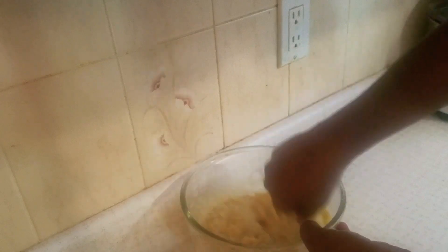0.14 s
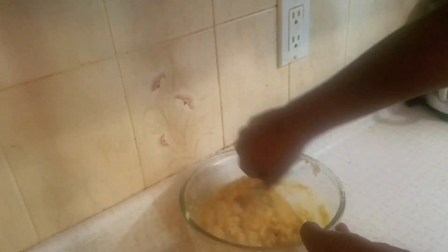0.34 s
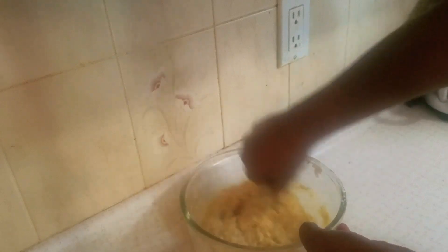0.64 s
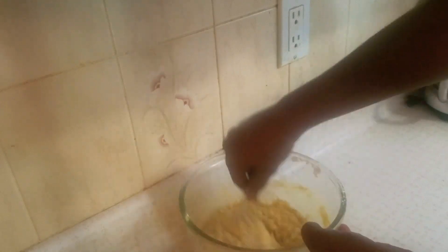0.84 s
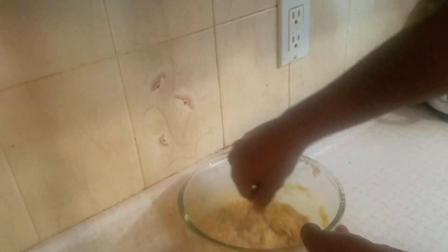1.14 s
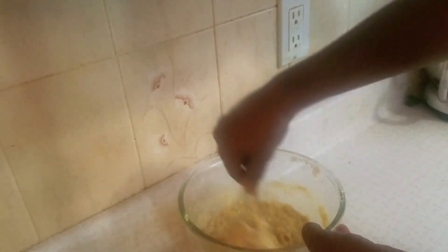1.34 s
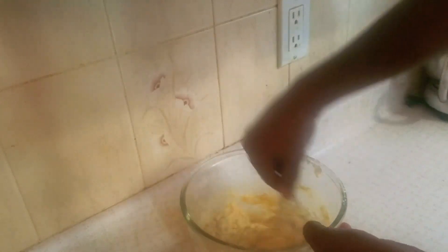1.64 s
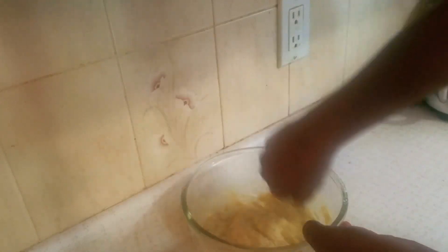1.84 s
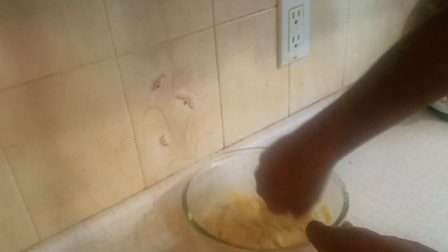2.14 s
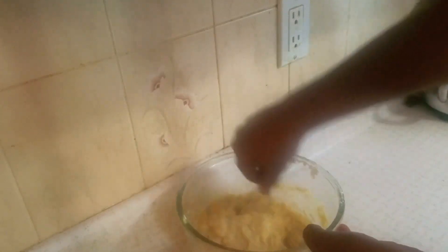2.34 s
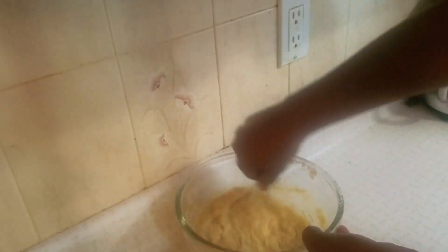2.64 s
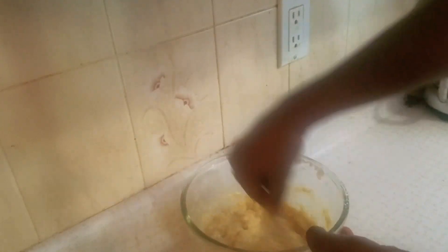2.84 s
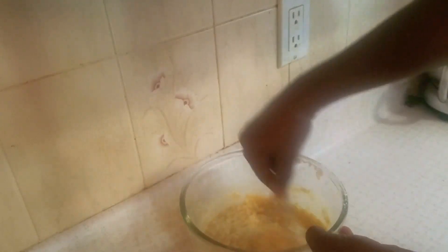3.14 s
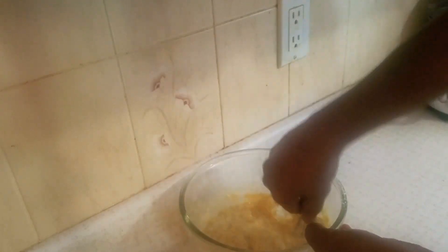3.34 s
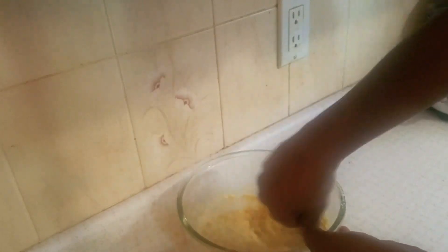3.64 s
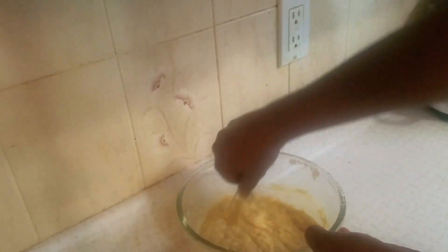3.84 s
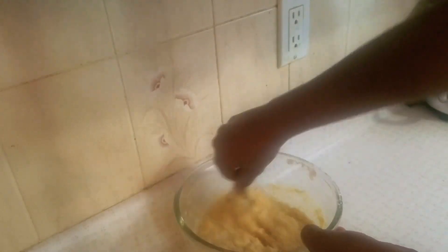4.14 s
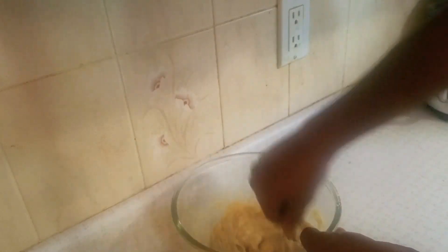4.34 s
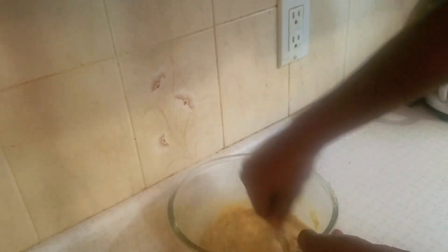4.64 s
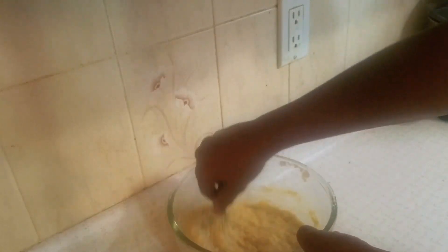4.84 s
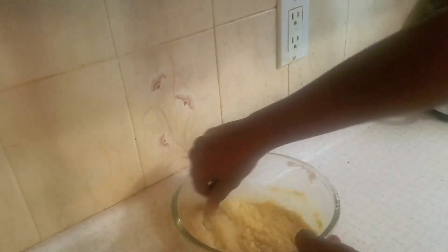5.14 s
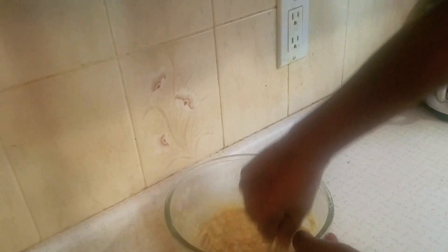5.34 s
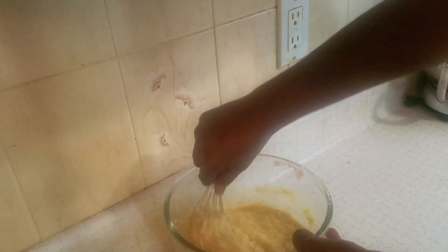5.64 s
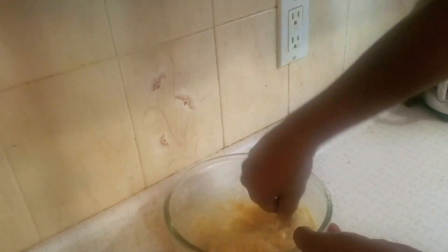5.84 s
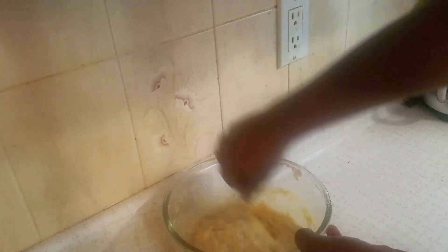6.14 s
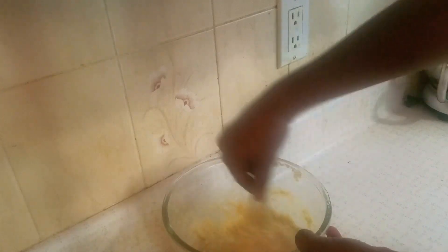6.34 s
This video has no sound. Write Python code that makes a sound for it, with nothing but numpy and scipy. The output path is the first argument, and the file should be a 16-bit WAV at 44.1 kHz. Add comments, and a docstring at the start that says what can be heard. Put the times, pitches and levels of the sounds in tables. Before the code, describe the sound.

Close up and slightly to the right, thick batter churns and crackles wetly under quick whisk strokes. Much louder than the stirring, the glass bowl tips and drops back on the counter with hollow, clattering knocks, first near the beginning and again in a cluster in the second half. In between, the wires give a few short clicks on the glass. The tiled kitchen adds a brief echo, and an appliance hums faintly behind.

```python
"""Whisking batter in a glass bowl

A wire whisk stirs thick batter in a tiled kitchen: the mass churns, its surface squelches and
crackles, air pockets pop. Hard strokes tip the bowl so that it knocks on the hollow counter;
now and then a wire clicks against the glass. An appliance hums behind."""
import sys
import numpy as np
from scipy import signal
from scipy.fft import rfft, irfft
from scipy.io import wavfile
from scipy.ndimage import map_coordinates

SR = 44100
rng = np.random.default_rng(int(sys.argv[2]) if len(sys.argv) > 2 else 0)


def generate_wav(signal):
    """Clip the signal to [-1, 1] and save it as 16-bit WAV at the path in sys.argv[1]."""
    frames = np.transpose(np.atleast_2d(signal))
    scaled = np.clip(frames, -1, 1) * 32767
    pcm = np.round(scaled).astype(np.int16)
    wavfile.write(sys.argv[1], SR, pcm)


N = 286650

# drag of the wires between strokes, easing as the batter smooths: t/s, level/dB
DRAG_EFFORT = [(0, -4), (1.0, -2.5), (1.25, -7.5), (2.4, -5), (3.4, -5), (4.3, -4.5), (4.8, -11.5),
               (5.3, -7), (5.6, -17.5), (5.9, -14), (6.5, -8.5)]


def from_db(db):
    return 10 ** (np.asarray(db) / 20)


def unit_rms(x):
    return x / np.sqrt(np.mean(x ** 2) + 1e-20)


def at_hz(points, hz):
    """Table lookup on a log-frequency axis."""
    freq, value = np.transpose(points)
    return np.interp(np.log(np.maximum(hz, 1)), np.log(freq), value)


def drift(rate_hz):
    """Slow random wander, rms 1."""
    r = np.exp(-80 * np.pi * rate_hz / SR)
    slow = signal.lfilter([1], [1, -2 * r, r * r], rng.standard_normal(N // 40 + 2002))[2000:]
    return np.interp(np.arange(N) / 40, np.arange(len(slow)), unit_rms(slow))


def cut(x, hz, kind, order=2):
    """Butterworth low- or high-pass."""
    return signal.sosfilt(signal.butter(order, min(hz, .45 * SR), kind, fs=SR, output="sos"), x + 1e-18)


def ring(force, hz, t60_s):
    """One mode: a unit click starts a decaying sine of height 1."""
    r, w = from_db(-60 / (t60_s * SR)), 2 * np.pi * hz / SR
    return signal.lfilter([0, np.sin(w)], [1, -2 * r * np.cos(w), r * r], force + 1e-18)


def modes(force, table):
    """A body's modes driven by a force."""
    return sum(from_db(db) * ring(force, hz, t60_s) for hz, db, t60_s in table)


def crack(spectrum, size=1024):
    """Crowded modes answer a blow with one minimum-phase snap; energy 1."""
    hz = np.arange(size // 2 + 1) * SR / size
    cepstrum = irfft(np.log(from_db(at_hz(spectrum, hz))))
    snap = irfft(np.exp(rfft(2 * cepstrum[:size // 2], size)))
    return snap / np.linalg.norm(snap)


def add(track, start_s, sound):
    i = max(round(start_s * SR), 0)
    track[..., i:i + sound.shape[-1]] += sound[..., :max(N - i, 0)]


def pan(x, left_db, right_lag_s=0):
    """Level of left against right, with an optional lag on the right."""
    right = map_coordinates(x[1], [np.arange(N) - right_lag_s * SR], order=3) if right_lag_s else x[1]
    return np.array([x[0], right]) * from_db([[left_db / 2], [-left_db / 2]])


def diffuse(size):
    """Frequencies and spectrum of stereo white noise, alike in the bass, unrelated in the treble."""
    # room field: f/Hz, left-right correlation
    correlation = [(130, 0.95), (300, 0.98), (640, 0.44), (1400, 0), (3000, 0), (7000, 0), (15000, 0)]
    hz = np.arange(size // 2 + 1) * SR / size
    mid, side = rfft(rng.standard_normal((2, size)))
    alike = np.clip(at_hz(correlation, hz), -1, 1)
    return hz, np.sqrt((1 + alike) / 2) * mid + np.sqrt((1 - alike) / 2) * side * [[1], [-1]]


def noise(spectrum):
    """Coloured diffuse noise, rms 1."""
    hz, white = diffuse(N)
    return unit_rms(irfft(white * from_db(at_hz(spectrum, hz)), N))


def kitchen(x, wet_db, early_db, early_s=0.0065, low_hz=220, size=24000):
    """Direct sound, early echoes off bowl and tiles, and a room tail dying band by band."""
    # room decay: f/Hz, t60/s
    room_t60 = [(150, 0.23), (500, 0.39), (1500, 0.41), (4000, 0.36), (8000, 0.22), (15000, 0.15)]
    t = np.arange(size) / SR
    hz, white = diffuse(size)
    edges_hz = np.geomspace(100, SR / 2, num=9)
    arrived, early = t > .0008, np.exp(-t / early_s)
    early = from_db(early_db) * early / np.linalg.norm(early)
    response = 0
    for low, high in zip(edges_hz, edges_hz[1:]):
        tail = from_db(-60 * t / at_hz(room_t60, np.sqrt(low * high)))
        envelope = np.hypot(from_db(wet_db) * tail / np.linalg.norm(tail), early)
        band = irfft(white * (hz >= low) * (hz < high), size)
        response = response + band * envelope * arrived
    out = signal.fftconvolve(x[None], cut(response, low_hz, "high"), axes=1)
    out[:, :len(x)] += x
    return out[:, :N]


def background(air_db=-49):
    """An appliance's mains hum and the still air of the room."""
    # hum partials: f/Hz, level/dB
    partials = [(59.2, -50), (118.4, -50), (174, -56)]
    # room noise density: f/Hz, level/dB
    air_spectrum = [(20, -15.5), (50, 0), (80, -5.5), (125, -1), (200, -13.5), (350, -13), (700, -17.5),
                    (1500, -29.5), (4000, -41), (8500, -65), (15000, -38)]
    t = np.arange(N) / SR
    hum = 0
    for hz, db in partials:
        amplitude = np.sqrt(2) * from_db(db + drift(3.9))
        hum = hum + amplitude * np.sin(2 * np.pi * hz * t + 0.51 * drift(1.8))
    return pan(hum + from_db(air_db) * noise(air_spectrum), -1.5)


def stirring(attack_s=0.029, release_s=0.038, drag_depth_db=2):
    """Strokes over steady drag; envelopes of push on the mass, pull on the surface, tearing of films."""
    # whisk sweeps: t/s, length/s, effort/dB, depth in the mass/dB, stickiness/dB
    strokes = [(0.0, .07, -0.5, -14, 3), (0.146, .06, 2, 2, 5.5), (0.412, 0.063, 5.5, 3.5, 0.5),
               (0.667, .12, 5, -2.5, 0), (1.005, 0.053, 2.5, 0.5, -4.5), (1.129, 0.019, -6.5, 9.5, -3),
               (1.565, .12, 1, -6, -3.5), (1.891, 0.086, 5.5, -3.5, 4), (2.126, 0.23, 0, -2.5, -1.5),
               (2.466, 0.073, -2, 8, 3), (2.72, 0.1, 5.5, -1.5, -6), (2.976, 0.33, -4, -0.5, 1),
               (3.377, 0.048, 4, -5, -2), (3.651, 0.045, 0, 5, -2.5), (3.924, .11, -3.5, 8, 1),
               (4.237, .12, 0.5, 6.5, -3), (4.592, 0.13, -5.5, 12.5, 0), (4.899, 0.16, -4, 5, -13),
               (5.705, .02, -3.5, -3, 0), (5.833, 0.085, -7.5, 8.5, -2), (6.086, 0.17, -6, 2, -1.5)]
    t = np.arange(N) / SR
    drag = from_db(np.interp(t, *np.transpose(DRAG_EFFORT)))
    power = (drag * from_db([[drag_depth_db], [0], [0]])) ** 2
    for start_s, length_s, effort_db, depth_db, sticky_db in strokes:
        swell = np.clip((t - start_s) / attack_s, 0, 1)
        release = np.exp(-np.clip((t - start_s - length_s) / release_s, 0, 20))
        power += (swell * release * from_db(effort_db) * from_db([[depth_db], [0], [sticky_db]])) ** 2
    return np.sqrt(power)


def film_snaps(spectrum, per_s, spread_db, clump_db, cycles, pitches=36):
    """Tiny batter films snap in clumps, each ringing a few cycles; rms 1."""
    born = rng.random(N) < per_s * from_db(clump_db * drift(25)) / SR
    clicks = born * from_db(spread_db * np.minimum(rng.exponential(1, N), 4)) * rng.choice([-1, 1], N)
    pitch_index = rng.integers(0, pitches, N)
    out = 0
    for k, hz in enumerate(np.geomspace(spectrum[0][0], min(spectrum[-1][0], .45 * SR), pitches)):
        snaps = np.diff(ring(clicks * (pitch_index == k), hz, cycles / hz), prepend=0)
        out = out + unit_rms(snaps) * np.sqrt(hz) * from_db(at_hz(spectrum, hz))
    return unit_rms(out)


def circling(x, wet_db, early_db, early_s, turns_per_s=2.9, spots=5):
    """The whisk circles the bowl from spot to spot, each with its own echoes."""
    turns = turns_per_s * np.arange(N) / SR
    distances = [np.abs((turns + k / spots) % 1 - .5) for k in range(spots)]
    return sum(kitchen(x * np.clip(1.5 - 2 * spots * d, 0, 1), wet_db, early_db, early_s) for d in distances)


def batter(churn_db=-47.5, squelch_db=-60, crackle_db=-66, crackle_exponent=0.86):
    """The wires churn the mass dully; its surface squelches and crackles as it parts."""
    # spectral densities of mass, surface and tearing films: f/Hz, level/dB
    churn_spectrum = [(30, -30), (80, -8), (165, 1.5), (250, -4.5), (370, -0.5), (600, -15.5), (900, -14.5),
                      (1500, -31.5), (3000, -47.5)]
    squelch_spectrum = [(600, 2), (1200, 7.5), (2100, 1), (3500, -5), (6000, -16.5), (9000, -110)]
    crackle_spectrum = [(4000, -5.5), (6500, 0), (8300, -51), (11500, 13), (15500, 3.5)]
    push, pull, tearing = stirring()
    churn = push * from_db(churn_db + 1.66 * drift(19)) * noise(churn_spectrum)
    squelch = film_snaps(squelch_spectrum, per_s=2000, spread_db=3.0, clump_db=3.5, cycles=5.7)
    squelch *= pull * from_db(squelch_db)
    crackle = film_snaps(crackle_spectrum, per_s=1000, spread_db=4.0, clump_db=4.5, cycles=13)
    crackle *= tearing ** crackle_exponent * from_db(crackle_db)
    squelch = circling(squelch, wet_db=-2.0, early_db=3.5, early_s=0.0047)
    crackle = circling(crackle, wet_db=4.5, early_db=3.5, early_s=0.0054)
    return pan(churn + squelch, -4.0) + pan(crackle, .8)


def small_pockets(per_s=4, base_db=-42.5, spread_db=2, low_hz=4000, high_hz=14000):
    """Random small bursts, weaker as the drag eases; rows of t/s, level/dB, f/Hz."""
    when, strength, pitch = rng.random((round(per_s * N / SR), 3)).T
    start_s = when * N / SR
    level_db = base_db + spread_db * (2 * strength - 1) + np.interp(start_s, *np.transpose(DRAG_EFFORT))
    return list(zip(start_s, level_db, low_hz * (high_hz / low_hz) ** pitch))


def pops(tear_s=0.0011, cavity_db=-10, cycles=3, gain_db=6):
    """A film tears in a spit of noise and the air pocket behind it rings, each at its own spot."""
    # largest bursts: t/s, level/dB, f/Hz
    large_pockets = [(0.0428, -46, 11200), (0.185, -36, 3900), (0.4625, -31, 4300), (0.7419, -40.5, 4000),
                     (1.294, -40, 7050), (1.3795, -41, 6550), (1.5844, -38.5, 10600), (1.8174, -40, 4290),
                     (2.1284, -39, 3950), (2.481, -35, 12400), (2.684, -40.5, 11800),
                     (3.5372, -29.5, 14600), (3.8194, -37.5, 3900), (4.0016, -42.5, 11400),
                     (4.959, -44, 6200), (5.1726, -45.5, 4300), (5.715, -49.5, 4630),
                     (6.4457, -43.5, 10700)]
    t, out = np.arange(1024) / SR, np.zeros((2, N))
    for start_s, level_db, hz in large_pockets + small_pockets():
        spit = cut(rng.standard_normal(len(t)) * np.exp(-t / tear_s), 0.75 * hz, "high")
        pop = unit_rms(spit) + from_db(cavity_db) * unit_rms(ring(spit, hz, cycles / hz))
        pop = from_db(level_db + gain_db) * pop / np.abs(pop).max()
        add(out, start_s, kitchen(pop, wet_db=-5, early_db=-0.5, early_s=0.007))
    return out


def knocks(clatter_db=10.0):
    """The bowl drops back on its foot: harder contact, shorter push, brighter knock. The row at 1.849 s is
    instead the dull thump of bowl and counter under the wire's hard click at 1.8475 s."""
    # foot on counter, plus one thump under a wire's click: t/s, level/dB, contact hardness/Hz, counter boom/dB,
    # bowl ring/dB
    landings = [(0.378, -2.5, 910, 0, 2.5), (0.618, -15.5, 450, 0.5, -1), (0.9099, -5.5, 800, 0, 0),
                (1.849, -26, 1100, 7, -0.5), (3.268, -19, 403, 7.5, 3), (3.293, -21.5, 250, 12.5, 8),
                (3.574, -28, 450, 2, 4), (3.8515, -4, 490, 0.5, 5.5), (4.182, -4.5, 874, 2.5, 0),
                (4.5242, -1.5, 1260, 1.5, 3), (4.551, -9.5, 1300, 9, -2.5), (4.802, -13.5, 510, -1.5, 2),
                (5.132, -30, 450, -18, 6.5), (5.2321, 2.5, 1460, 1, 0.5), (5.261, -3.5, 1730, 5, 0.5)]
    # modes of bowl and hollow counter: f/Hz, level/dB, t60/s
    bowl_modes = [(371.5, -12.5, 0.17), (473, -25, 0.12), (531.5, -24.5, 0.17), (610, -39, 0.14),
                  (716.7, -23, 0.18), (952, -34, 0.11), (1050, -17.5, 0.096), (1540, -29.5, .14)]
    counter_modes = [(62.5, -37, 0.086), (117.3, -10.5, 0.19), (169.4, -18.5, 0.15), (197, -15.5, 0.15),
                     (250, -28.5, 0.23), (306.8, -23.5, 0.23)]
    # crowded upper modes of both: f/Hz, level/dB
    clatter_spectrum = [(200, -8), (500, 5), (800, -7), (1100, -3), (1550, -3), (2500, -4.5), (3500, -12),
                        (5000, -15), (8000, -26), (15000, -23.5)]
    t = np.arange(1024) / SR
    on_foot, on_bowl, on_counter = np.zeros((3, N))
    clatter = np.zeros((2, N))
    for start_s, level_db, hard_hz, boom_db, ring_db in landings:
        push = t * np.exp(-2 * np.pi * hard_hz * t)
        push = -from_db(level_db) * push / push.sum()
        add(on_foot, start_s, push)
        add(on_bowl, start_s, push * from_db(ring_db))
        add(on_counter, start_s, push * from_db(boom_db))
        snap = np.convolve(push, crack(clatter_spectrum))
        # new spot, new echoes
        add(clatter, start_s, kitchen(snap, wet_db=6.5, early_db=4.5, early_s=0.0054))
    bounce = ring(on_foot, hz=420, t60_s=0.024)
    # small bodies radiate little bass
    bowl = cut(bounce + modes(on_bowl, bowl_modes), 224, "high")
    counter = cut(modes(on_counter, counter_modes), 65, "high")
    thud = kitchen(bowl + counter, wet_db=-9, early_db=-15.5)
    return pan(thud + from_db(clatter_db) * clatter, -3.5, right_lag_s=0.00019)


def clinks(cage_db=-5.0):
    """A wire hits the bowl: the cage cracks brightly; batter damps the glass almost at once."""
    # wire on glass: t/s, level/dB, brightness/Hz, glass ring/dB
    hits = [(1.444, -25.5, 502, 0.5), (1.8475, 0.5, 11000, 0), (2.15, -20, 2000, 3.5),
            (2.2814, -23.5, 4940, -2), (2.7372, -24.5, 5000, 5), (3.246, -20, 5000, -2),
            (3.2613, -7.5, 1670, 6.5), (4.297, -14, 14000, -9)]
    # clearest glass modes: f/Hz, level/dB, t60/s
    glass_modes = [(1157, -28.5, 0.037), (1360, -31.5, 0.058), (1903, -35, 0.13), (2560, -18, 0.0052)]
    # crowded modes of the wire cage: f/Hz, level/dB
    cage_spectrum = [(300, -10), (800, -10.5), (1200, -4.5), (2700, -2), (3700, -8), (5000, -2.5),
                     (7400, -8.5), (8400, -10.5), (14500, -2.5)]
    taps, cage = np.zeros(N), np.zeros((2, N))
    for start_s, level_db, bright_hz, ring_db in hits:
        add(taps, start_s, from_db([level_db + ring_db]))
        snap = cut(crack(cage_spectrum), bright_hz, "low", order=1)
        snap = from_db(level_db + cage_db) * snap / np.linalg.norm(snap)
        add(cage, start_s, kitchen(snap, wet_db=1.5, early_db=7.5, early_s=0.0032))
    glass = sum((-1) ** k * from_db(db) * ring(taps, hz, t60_s)
                for k, (hz, db, t60_s) in enumerate(glass_modes))
    return cage + glass


def scene():
    """Bowl, whisk and batter a little to the right; deep bass cut."""
    wires = pan(clinks(), -3.5, right_lag_s=.00006)
    bursts = pan(pops(), .4, right_lag_s=.00004)
    return cut(knocks() + wires + bursts + batter() + background(), 39, "high")


def record(dry, limit_db=0.5, release_db_per_s=6, attack_s=0.00037, cutoff_hz=16100):
    """A limiter ducks at the loudest knocks and recovers slowly; soft clip, then low-pass."""
    over_db = np.maximum(20 * np.log10(np.abs(dry).max(axis=0) + 1e-9) - limit_db, 0)
    recovery_db = release_db_per_s * np.arange(N) / SR
    duck_db = np.maximum.accumulate(over_db + recovery_db) - recovery_db
    r = np.exp(-1 / (attack_s * SR))
    limited = dry * from_db(-signal.lfilter([1 - r], [1, -r], duck_db))
    rounded = limited / (1 + limited ** 6) ** (1 / 6)
    return signal.sosfilt(signal.ellip(10, .1, 80, cutoff_hz, fs=SR, output="sos"), rounded)


dry = scene()
out = record(dry)
generate_wav(out)
```